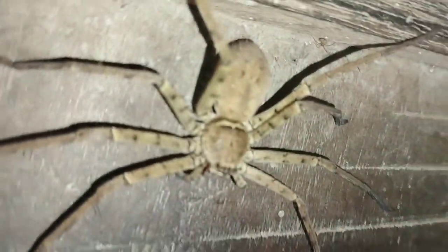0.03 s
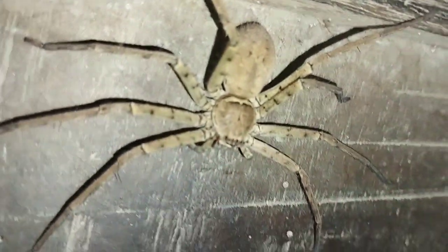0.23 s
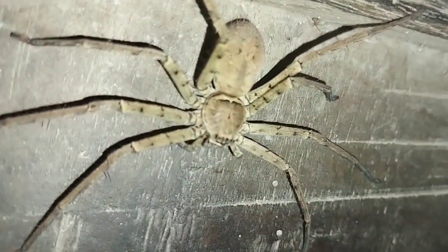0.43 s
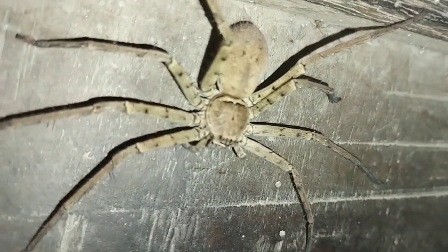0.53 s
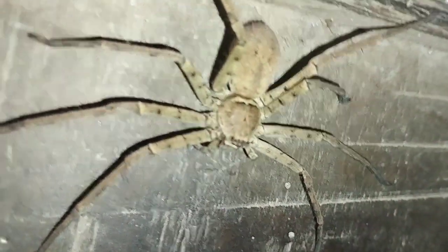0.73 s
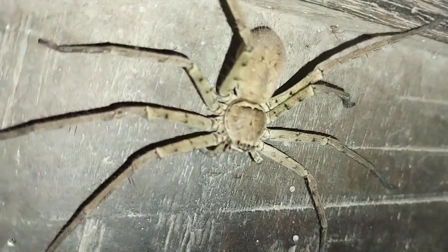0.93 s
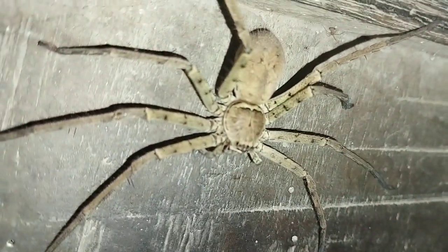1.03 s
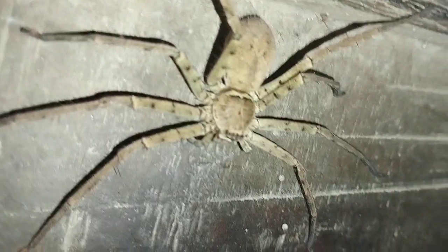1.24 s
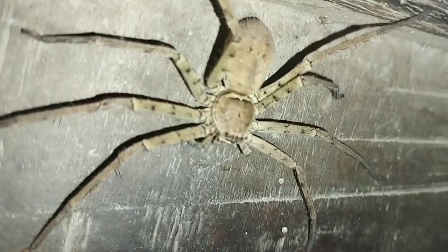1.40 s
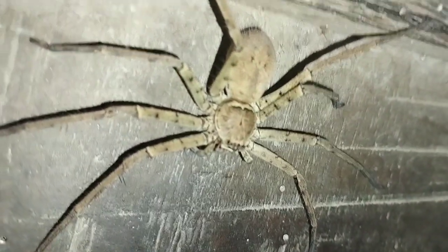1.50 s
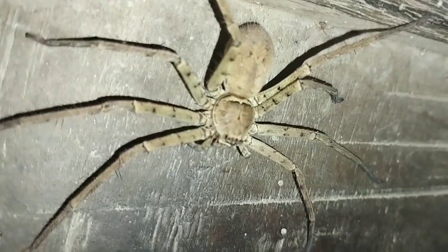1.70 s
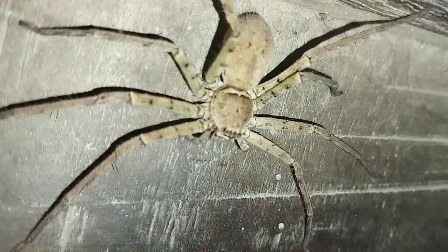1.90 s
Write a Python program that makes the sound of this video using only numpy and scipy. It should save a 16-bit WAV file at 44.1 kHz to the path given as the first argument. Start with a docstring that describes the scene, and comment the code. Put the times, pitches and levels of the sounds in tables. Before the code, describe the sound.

Fingers rub and scrape on a hand-held camera, right at the microphone. A sharp snap and a quickening run of dull knocks come first, then more sliding and a second snap, over faint hiss in a quiet place.

```python
"""In a quiet place, fingers shift their grip on a hand-held camera.
Over a faint steady hiss, skin slides across the case in a few strokes. Its countless tiny slips
make a bright grainy hiss and a low rumble. The case ticks and snaps, and a fingertip sticks and
slips in a quickening run of dull knocks beside the microphone. A few stray knocks follow,
and the last stroke brings a faint squeak."""
import sys
import numpy as np
from scipy import signal
from scipy.fft import rfft, irfft
from scipy.io import wavfile

SR = 44100
rng = np.random.default_rng(int(sys.argv[2]) if len(sys.argv) > 2 else 0)


def generate_wav(sig):
    """Save sig (samples, or channels by samples) to the path in sys.argv[1] as 16-bit PCM at SR."""
    pcm = np.round(np.clip(np.atleast_2d(sig).T, -1, 1) * 32767).astype(np.int16)
    wavfile.write(sys.argv[1], SR, pcm)


N = 85995

# A "colour" says how strong the low and high pitches of a sound are next to each other.
# Colour of the room and microphone hiss: f/Hz, level/dB
HISS_COLOUR = [(30, 8), (130, 7.5), (400, -1.5), (800, -3.5), (2000, -10), (4500, -15.5), (5400, -15.5),
               (7000, -19.5), (9200, -19), (11000, -21), (14000, -17.5)]
# Loudness of the four rubbing strokes and of the hand's rumble: t/s, level/dB
BRUSH_LEVEL = [(0, -53), (.07, -58), (.12, -59.5), (.2, -60), (.23, -70)]
SCRAPE_LEVEL = [(.208, -58), (.213, -43.5), (.219, -45), (.226, -40), (.262, -43), (.295, -45.5),
                (.315, -57), (.37, -60.5), (.392, -50), (.41, -59), (.5, -68)]
SLIDE_LEVEL = [(.49, -75), (.55, -61), (.565, -53.5), (.64, -51.5), (.685, -52.5), (.715, -48.5),
               (.765, -50), (.8, -58), (.86, -49.5), (.9, -63), (.93, -71)]
REGRIP_LEVEL = [(1.14, -77), (1.24, -70), (1.295, -54), (1.33, -57.5), (1.35, -68), (1.4, -86),
                (1.425, -56), (1.437, -47.5), (1.468, -52.5), (1.485, -61.5), (1.55, -58), (1.59, -53),
                (1.675, -54.5), (1.71, -71), (1.865, -69.5), (1.882, -54.5), (1.95, -75)]
RUMBLE_LEVEL = [(0, -61), (.18, -68.5), (.23, -54.5), (.45, -54), (.505, -63), (.535, -52.5), (.72, -54),
                (.8, -58.5), (.85, -49), (.93, -66.5), (1.1, -72), (1.3, -59.5), (1.39, -75), (1.45, -55),
                (1.5, -64), (1.6, -60), (1.73, -64), (1.95, -69.5)]
# Colour of each stroke and of the rumble: f/Hz, level/dB
BRUSH_COLOUR = [(200, -5), (1300, -7), (3600, -15), (5600, -10.5), (6400, -4.5), (7500, -9.5), (9700, -1.5),
                (10700, -6.5), (14000, -9)]
SCRAPE_COLOUR = [(200, -10), (800, -11), (1500, -9), (2200, -19.5), (2900, -8.5), (3700, -18),
                 (4300, -13.5), (5000, -15), (5550, -9.5), (6100, -16.5), (6700, -8.5), (8000, -11.5),
                 (9300, -3), (11400, -14.5), (14000, -13.5)]
SLIDE_COLOUR = [(200, -4.5), (500, -3), (1000, -5), (1500, -10.5), (3050, -15.5), (4300, -14.5),
                (5100, -6.5), (5900, -21.5), (6650, -4.5), (7200, -12), (8050, -14), (8700, -2), (9400, -4),
                (11000, -22.5), (14000, -21)]
REGRIP_COLOUR = [(200, 3.5), (800, -4), (1300, -0.5), (3500, -8), (4400, -5), (5600, -6), (6900, -1.5),
                 (8200, -4), (9200, -2), (11500, -7.5), (14000, -11)]
RUMBLE_COLOUR = [(20, -10), (45, 0), (70, 0.5), (110, -2), (170, -5), (260, -15.5), (500, -17), (1500, -43)]
# Share of the rubbing and hiss that differs between left and right: f/Hz, level/dB
STEREO_SPREAD = [(3000, -66), (4500, -25.5), (7000, -4), (14000, -6.5)]
# Small gritty ticks: t/s, level/dB, fade time/s
GRIT_TICKS = [(0.082, -45, 0.0014), (.085, -37, 0.0018), (.213, -42, 0.0064), (0.3214, -40.5, 0.0018),
              (0.354, -40.5, 0.0028), (0.397, -45.5, 0.0019), (0.8528, -35.5, 0.00061),
              (0.9433, -58, 0.0019), (1.3616, -58, 0.0014), (1.4339, -32, 0.00042), (1.462, -48, 0.0016),
              (1.491, -45, 0.00047), (1.806, -49.5, 0.00055), (1.905, -46, 0.00055)]
# Sharp snaps of the case: t/s, peak level/dB
CASE_SNAPS = [(.2726, -0.5), (1.4348, -35), (1.6657, -9.5)]
# Colour of the ticks and of the snaps: f/Hz, level/dB
TICK_COLOUR = [(200, -44), (2000, -9), (4500, -9), (7000, -3), (9300, 2.5), (11500, -6), (14000, -16.5)]
SNAP_COLOUR = [(100, -42), (1200, -38), (2900, -23.5), (4300, -26), (6000, -14.5), (7300, -5), (8400, -6),
               (9500, 0), (11500, -8), (14000, -11)]
# Fingertip knocks: t/s, pulse level/dB, pulse width/s, thud level/dB, thud f/Hz
FINGER_KNOCKS = [(0.3209, -30, 0.00016, -27.5, 123), (0.3523, -20, 0.00015, -26.5, 128),
                 (0.3954, -17.5, 0.00015, -27.5, 156), (0.4321, -22, 0.00021, -34, 172),
                 (0.457, -26, 0.00023, -40, 196), (0.4751, -27, 0.00022, -56, 250),
                 (0.536, -57, 0.00046, -43, 100), (1.14, -26.5, 0.00015, -42, 226),
                 (1.5363, -43, 0.00022, -41.5, 141), (1.5869, -46, 0.00061, -35, 99)]
# Ringing tones of the squeak: f/Hz, level/dB
SQUEAK_TONES = [(711, -62), (1660, -66.5), (4090, -64), (4560, -62), (5370, -66), (7020, -71)]

TIME = np.arange(N) / SR
FREQS = np.fft.rfftfreq(N, 1 / SR)


def gain(db):
    """Turns decibels into a number to multiply by."""
    return 10 ** (np.asarray(db) / 20)


def unit_power(x):
    """Scales a signal to an average power of one."""
    return x / np.sqrt(np.mean(x ** 2) + 1e-20)


def gain_at(colour, hz):
    """Looks up how strong a colour is at the given frequencies."""
    f, db = np.transpose(colour)
    return gain(np.interp(np.log(hz + 1), np.log(f), db))


def loudness(levels):
    """Joins (time, level) points into a curve that fades away beyond both ends."""
    times, db = np.transpose(levels)
    outside = np.maximum(times[0] - TIME, 0) + np.maximum(TIME - times[-1], 0)
    return gain(np.interp(TIME, times, db)) * np.exp(-(outside / .006) ** 2)


def add(mix, start, sound):
    """Adds a sound to the mix at a start time in seconds."""
    part = mix[max(round(start * SR), 0):][:len(sound)]
    part += sound[:len(part)]


def ring(colour, size=4096):
    """The short ring, with an energy of one, of something with this colour when tapped once."""
    log_gain = np.log(gain_at(colour, abs(np.fft.fftfreq(size, 1 / SR))))
    spectrum = np.exp(np.conj(signal.hilbert(log_gain)))  # nothing sounds before the tap
    response = np.fft.ifft(spectrum).real[:size // 2]
    return response / np.linalg.norm(response)


def tint(x, colour):
    """Gives a signal a colour."""
    return signal.fftconvolve(x, ring(colour))[:len(x)]


def wander(seconds):
    """A smooth random wobble; more seconds make it slower."""
    smoothing = np.exp(-(2 * FREQS * seconds) ** 2)
    return unit_power(irfft(rfft(rng.standard_normal(N)) * smoothing, N))


def cut_bass(x, hz, q):
    """Weakens everything below hz; a higher q makes the corner sharper."""
    w = 2 * np.pi * hz
    return signal.lfilter(*signal.bilinear([1, 0, 0], [1, w / q, w * w], SR), x)


def steady_hiss(db=-63):
    """The room and the microphone hiss faintly all the time."""
    return gain(db) * tint(rng.standard_normal(N), HISS_COLOUR)


def rub(levels, colour, roughness, grain_s=0.0018, catch_s=0.0022, flutter_db=2):
    """Countless tiny slips of skin, bunched into grains, sound through the case."""
    grains = flutter_db * wander(grain_s)  # single slips
    catches = flutter_db * wander(catch_s)  # slower catching and letting go
    slips = rng.standard_normal(N) * gain(roughness * (grains + catches))
    return tint(unit_power(slips) * loudness(levels), colour)


def strokes():
    """Skin rubs over the case in four strokes, each with its own colour."""
    return (rub(BRUSH_LEVEL, BRUSH_COLOUR, roughness=0.65)
            + rub(SCRAPE_LEVEL, SCRAPE_COLOUR, roughness=0.8)
            + rub(SLIDE_LEVEL, SLIDE_COLOUR, roughness=0.88)
            + rub(REGRIP_LEVEL, REGRIP_COLOUR, roughness=0.76))


def hand_rumble():
    """The moving hand also makes a deep, rough rubbing sound."""
    return rub(RUMBLE_LEVEL, RUMBLE_COLOUR, roughness=1.0)


def ticks():
    """Short gritty bursts come where the skin lets go."""
    bursts, t = np.zeros(N), TIME[:SR // 40]
    for start, db, fade_s in GRIT_TICKS:
        add(bursts, start, gain(db) * np.exp(-t / fade_s) * rng.standard_normal(len(t)))
    return tint(bursts, TICK_COLOUR)


def snaps():
    """Single jolts ring the high pitches of the case for an instant."""
    out, click = np.zeros(N), ring(SNAP_COLOUR)
    for start, db in CASE_SNAPS:
        add(out, start, gain(db) * click / abs(click).max())
    return out


def knocks(thud_delay_s=0.00053, fade_cycles=0.43, air_hz=617, air_db=-4):
    """Each fingertip slip sends out a hollow pulse; the kick back swings the case once or twice."""
    pulses, thuds = np.zeros(N), np.zeros(N)
    for when, pulse_db, width_s, thud_db, thud_hz in FINGER_KNOCKS:
        pulses += gain(pulse_db) / np.cosh(np.minimum(abs(TIME - when) / width_s, 20))
        cycles = np.maximum(TIME - when - thud_delay_s, 0) * thud_hz
        thuds -= gain(thud_db) * np.sin(2 * np.pi * cycles) * np.exp(-cycles / fade_cycles)
    # The pocket of air under the finger makes the knock hollow.
    hollow = signal.lfilter(*signal.iirpeak(air_hz, Q=1.5, fs=SR), pulses)
    return cut_bass(pulses, hz=276, q=0.31) + gain(air_db) * hollow + thuds


def squeak(loudest_at_s=1.9, width_s=0.039, waver_s=0.0076):
    """The last stroke sets a few wavering tones ringing in the case."""
    tones = sum(gain(db) * np.sin(2 * np.pi * hz * TIME + wander(waver_s)) for hz, db in SQUEAK_TONES)
    return tones * np.exp(-((TIME - loudest_at_s) / width_s) ** 2)


def scene():
    """Everything sits in the centre; only the highs of the rubbing and hiss spread wider."""
    centre = steady_hiss() + strokes() + hand_rumble() + ticks() + snaps() + knocks() + squeak()
    fresh_noise = steady_hiss() + strokes()
    side = irfft(rfft(fresh_noise) * gain_at(STEREO_SPREAD, FREQS), N)
    return np.array([centre + side, centre - side])


def record(dry, lowest_hz=87.4, highest_hz=14330):
    """The camera weakens the deepest rumble and cuts off the very highest pitches."""
    treble_cut = signal.firwin(511, highest_hz, window=("kaiser", 8), fs=SR)
    return signal.oaconvolve(cut_bass(dry, lowest_hz, q=.7), treble_cut[None], "same")


dry = scene()
out = record(dry)
generate_wav(out)
```